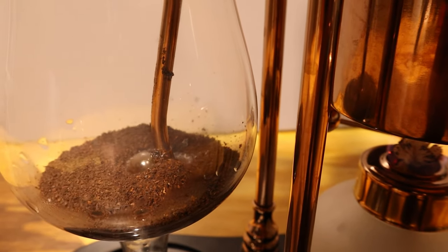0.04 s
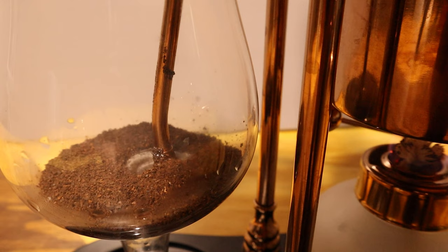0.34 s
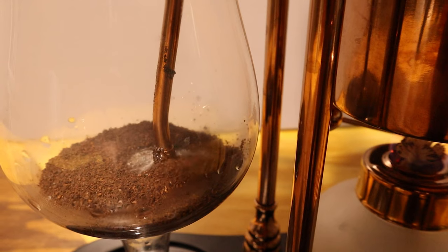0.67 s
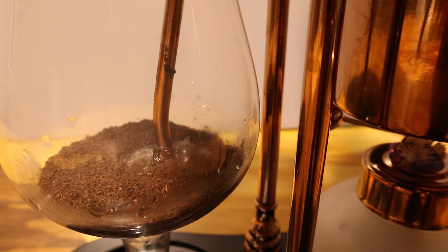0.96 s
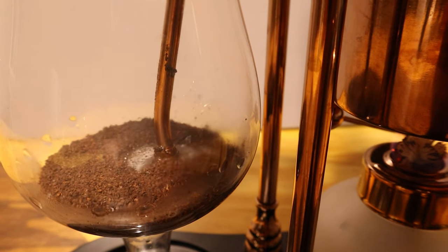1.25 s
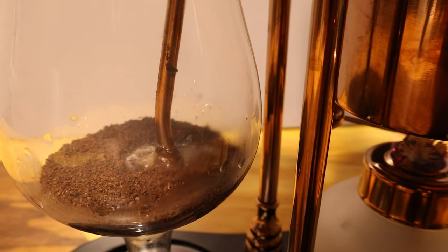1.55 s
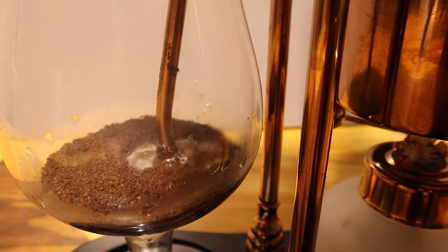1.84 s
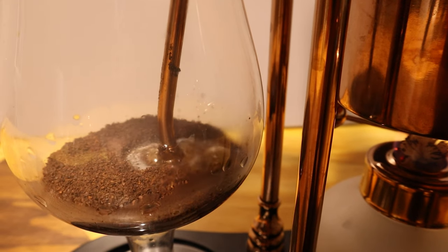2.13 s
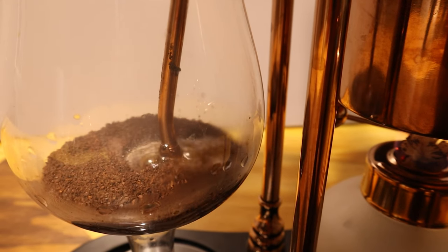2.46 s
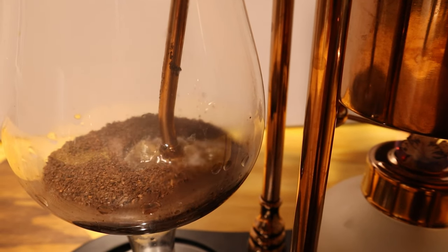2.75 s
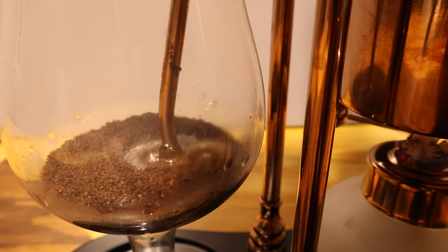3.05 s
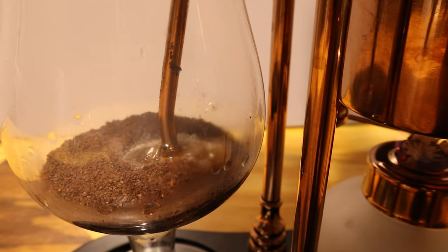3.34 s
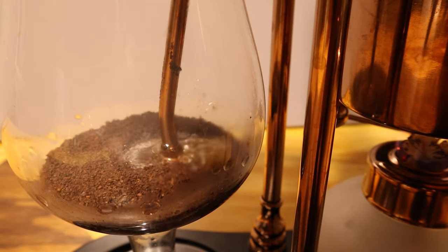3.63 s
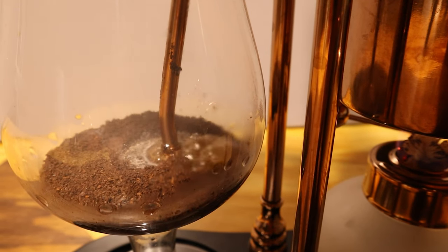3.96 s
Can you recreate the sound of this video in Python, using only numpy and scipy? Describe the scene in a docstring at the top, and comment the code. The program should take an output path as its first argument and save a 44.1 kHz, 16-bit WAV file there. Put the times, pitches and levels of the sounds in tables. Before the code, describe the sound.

Close, steady bubbling and gurgling comes from a glass coffee brewer in a small room. Hollow plops, dull knocks and a faint wet fizz mix with the rapid glugs, and sharper pops stand out in the second half.

```python
"""Glass siphon coffee brewer at the boil

Close by, indoors. Steam gulps through the water in quick low glugs over a simmer of small bubbles,
stalling now and then; a narrow cavity answers with hollow plops, and collapsing steam bubbles knock.
Wet fizz follows the glugs. Bubbles break through the grounds and pop in the glass, louder later on."""
import sys
import numpy as np
from scipy import signal
from scipy.fft import rfft, irfft, next_fast_len
from scipy.io import wavfile
from scipy.ndimage import map_coordinates

SR = 44100
rng = np.random.default_rng(int(sys.argv[2]) if len(sys.argv) > 2 else 0)


def wrap_up_sound(samples):
    """Save the sound to the file named by the first command line argument, as 16-bit audio."""
    columns = np.atleast_2d(samples).T
    # keep every value between -1 and 1, then stretch to whole-number steps
    tamed = np.clip(columns, -1, 1)
    steps = np.round(tamed * 32767).astype(np.int16)
    wavfile.write(sys.argv[1], SR, steps)


N = 176400
TIME_S = np.arange(N) / SR


def amp(db):
    return 10 ** (np.asarray(db) / 20)


def unit(x):
    return x / np.sqrt(np.mean(x ** 2) + 1e-20)


def noise():
    return rng.standard_normal(N)


def wobble(knots_per_s):
    """Smooth random curve."""
    knots = rng.standard_normal(int(N * knots_per_s / SR) + 4)
    return map_coordinates(knots, [TIME_S * knots_per_s])


def filtered(x, response):
    """x times a complex response of frequency."""
    size = next_fast_len(N + SR // 2)
    return irfft(rfft(x, size) * response(np.fft.rfftfreq(size, 1 / SR)), size)[:N]


def coloured(x, points):
    """x through a minimum-phase filter with the given (Hz, dB) points; rms 1."""
    hz, db = np.transpose(points)
    size = 4096
    log_hz = np.log(np.fft.rfftfreq(size, 1 / SR) + 1)
    cepstrum = irfft(np.log(amp(np.interp(log_hz, np.log(hz), db))))
    cepstrum[1:size // 2] *= 2
    cepstrum[size // 2 + 1:] = 0
    impulse = irfft(np.exp(rfft(cepstrum)))
    return unit(signal.fftconvolve(x, impulse)[:N])


def ring(x, modes, direct=0):
    """x through (Hz, width Hz, dB) resonances, plus a direct share."""
    return filtered(x, lambda f: direct + sum(
        amp(db) * 1j * f * width / (hz * hz - f * f + 1j * f * width) for hz, width, db in modes))


def swell(peak_s, rise_s, t60_s):
    """Envelope that rises to 1, then dies away."""
    t = TIME_S - peak_s
    return np.exp(-(np.minimum(t, 0) / rise_s) ** 2) * amp(-60 * np.maximum(t, 0) / t60_s)


def bubbles(peak_s, gain, hz, rise_s, t60_s, glide):
    """Bubbles ring and glide upward; returns sound and envelope."""
    offsets = np.arange(-SR // 40, SR // 12)
    t = offsets / SR
    peak_s, gain, hz, rise_s, t60_s = (np.reshape(v, (-1, 1)) for v in (peak_s, gain, hz, rise_s, t60_s))
    fade = (np.hypot(np.maximum(t, 0), rise_s / 2) - rise_s / 2) / t60_s
    env = gain * np.exp(-(np.minimum(t, 0) / rise_s) ** 2 - np.log(1000) * fade)
    cycles = hz * t * (1 + glide * t / t60_s) + rng.random(peak_s.shape)
    wave = env * np.sin(2 * np.pi * cycles)
    at = np.round(peak_s * SR).astype(int) + offsets
    inside = (at >= 0) & (at < N)
    return [np.bincount(at[inside], v[inside], N) for v in (wave, env)]


def swarm(drive, per_s, hz, spread, t60_cycles, rise_cycles, scatter_db, glide, drift_hz_per_s=0):
    """Random bubbles whose strength follows the drive; rms 1."""
    count = int(per_s * N / SR)
    jitter, detune, strength = rng.standard_normal((count, 3)).T
    peak_s = ((np.arange(count) + jitter) / per_s) % (N / SR)
    pitch_hz = (hz + drift_hz_per_s * peak_s) * np.exp(spread * detune)
    gain = amp(scatter_db * strength) * np.interp(peak_s, TIME_S, drive)
    return unit(bubbles(peak_s, gain, pitch_hz, rise_cycles / pitch_hz, t60_cycles / pitch_hz, glide)[0])


# Background spectrum: (frequency [Hz], gain [dB])
HISS_SPECTRUM = [(20, -3), (60, 14), (300, 20), (1000, 7), (3500, 0), (4300, -3), (5300, -1), (6000, 6),
                 (6400, -5.5), (6900, -15), (8200, -5.5), (9500, -13.5), (11000, -9), (12500, -18.5),
                 (14300, -17.5), (15800, -28)]


def hiss():
    """Faint steady background noise."""
    return amp(-60.5) * coloured(noise(), HISS_SPECTRUM)


def room(x, t60_s=0.32):
    """Short reverberant tail of a small room."""
    t = TIME_S[:SR // 3]
    tail = rng.standard_normal(len(t)) * amp(-60 * t / t60_s)
    return signal.fftconvolve(x, tail / np.linalg.norm(tail))[:N]


# High plips: (time [s], pitch [Hz], peak [dB])
PLIP_EVENTS = [(.275, 2760, -52.5), (.48, 2840, -53), (.578, 2725, -55), (.748, 2760, -53),
               (1.714, 2730, -56), (2.028, 2798, -54), (2.196, 5400, -63)]


def plips():
    """Soft, unsteady high plips, mostly at the cavity's overtone."""
    wavering_s = np.cumsum(1 + 0.05 * wobble(600)) / SR
    return sum(amp(db) * swell(at, rise_s=0.0031, t60_s=0.058) * np.sin(2 * np.pi * hz * wavering_s)
               for at, hz, db in PLIP_EVENTS)


# Bubble flurries: (start [s], length [s], level [dB])
SPLUTTER_EVENTS = [(0.27, 0.016, -48), (0.553, 0.047, -53), (.74, 0.015, -50), (1.055, 0.031, -42.5),
                   (1.165, 0.018, -49.5), (1.785, 0.018, -51.5), (1.826, 0.012, -47.5), (2.123, 0.051, -55),
                   (2.198, .03, -48.5), (3.14, .03, -50), (3.615, 0.013, -46), (3.767, 0.013, -47.5)]


def splutters(edge_s=0.0013):
    """Small bubbles ring in short dense flurries."""
    env = np.zeros(N)
    for start_s, length_s, db in SPLUTTER_EVENTS:
        outside_s = np.maximum(np.abs(TIME_S - start_s - length_s / 2) - length_s / 2, 0)
        env += amp(db) * np.exp(-outside_s / edge_s)
    return env * swarm(np.ones(N), per_s=900, hz=790, spread=0.37, t60_cycles=6.3, rise_cycles=0.37,
                       scatter_db=3, glide=0.14)


# Air modes of the glass bowl: (frequency [Hz], width [Hz], gain [dB])
BOWL_MODES = [(1915, 290, 4), (2256, 74, 1), (2754, 29, 0.5), (3002, 43, 10.5), (3160, 120, 5.5),
              (3442, 46, 11), (3684, 116, 5.5), (4693, 41, 6.5), (5530, 60, -1.5), (5870, 270, -1),
              (7380, 28, 0), (8175, 170, 0.5), (8340, 57, -4), (8710, 61, -1), (9500, 77, 2.5),
              (9850, 100, -2), (10470, 74, -1), (12900, 130, -1)]
# Fizz spectrum: (frequency [Hz], gain [dB])
FIZZ_SPECTRUM = [(300, 2), (1000, 13), (1700, -4), (2250, 9), (2520, 4.5), (3000, -2), (3700, -3.5),
                 (4250, -6.5), (5900, -5), (6900, -14.5), (8200, -14.5), (12000, -27), (15500, -49)]


def fizz(flow, push):
    """Wet spray follows each gulp and rings the bowl."""
    spray = noise() * flow * (1.08 + push) * amp(6.2 * np.tanh(wobble(170)))
    return coloured(ring(spray, BOWL_MODES, direct=0.36), FIZZ_SPECTRUM)


# Surface bursts: (time [s], relative level [dB])
POP_EVENTS = [(0.127, -54), (.432, -56), (.448, -52), (.541, -52), (.56, -53.5), (.69, -54.5),
              (.715, -51.5), (.993, -51.5), (1.082, -53.5), (1.408, -54), (1.534, -55), (2.126, -48),
              (2.218, -52.5), (2.428, -48), (2.466, -47), (2.484, -49), (2.5809, -39), (2.589, -35),
              (2.746, -47.5), (2.853, -43), (2.859, -53), (3.048, -49.5), (3.201, -48.5), (3.285, -49),
              (3.352, -41), (3.3554, -34.5), (3.646, -44.5), (3.65, -46), (3.713, -47.5), (3.779, -47.5),
              (3.786, -50), (3.79, -34), (3.794, -46), (3.8012, -40.5), (3.917, -40), (3.921, -41.5),
              (3.951, -49.5)]
# Spray and film-snap spectra: (frequency [Hz], gain [dB])
SPRAY_SPECTRUM = [(300, -28), (1200, 2.5), (1900, -1.5), (3600, -3), (4300, 0.5), (6000, -4.5), (6900, -17),
                  (7800, -0.5), (8500, -2), (9300, -6.5), (10700, -6), (12200, -16), (15500, -20)]
SNAP_SPECTRUM = [(300, -36), (1200, -1.5), (1900, 3), (3700, 2.5), (4500, -14), (6000, -16.5), (15500, -35)]


def pops(snap_rise_s=0.00069, spray_rise_s=0.0019, crossover_hz=4430):
    """Each film snaps, then a brief spray rings the bowl; strong bursts are brighter."""
    def lowpass(hz):
        return 1 / np.sqrt(1 + (hz / crossover_hz) ** 8)

    start_s, db = np.transpose(POP_EVENTS)
    treble_db = db + 0.35 * (db - db.max())
    shapes = np.array([swell(at + spray_rise_s, spray_rise_s, t60_s=0.05) for at in start_s])
    spatter = amp(6 * np.tanh(wobble(450)))
    body = noise() * np.sqrt(amp(db) ** 2 @ shapes ** 2)
    treble = noise() * np.sqrt(amp(treble_db) ** 2 @ shapes ** 2)
    spray = filtered(body, lowpass) + filtered(treble, lambda hz: np.sqrt(1 - lowpass(hz) ** 2))
    splash = np.std(body) * coloured(ring(spatter * spray, BOWL_MODES, direct=0.32), SPRAY_SPECTRUM)
    clicks = noise() * sum(amp(level) * swell(at + snap_rise_s, snap_rise_s, t60_s=0.011)
                           for at, level in POP_EVENTS)
    snap = np.std(clicks) * coloured(clicks, SNAP_SPECTRUM)
    return amp(-3.5) * splash + amp(-0.5) * snap


CAVITY_HZ, CAVITY_DRIFT_HZ_PER_S, CAVITY_WIDTH_HZ = 1303.2, 11.6, 55


def cavity(flow):
    """Surging steam rings a narrow cavity whose pitch creeps upward."""
    surge = amp(5 * np.tanh(wobble(70))) * noise() * flow
    first, last = (ring(surge, [(CAVITY_HZ + CAVITY_DRIFT_HZ_PER_S * at, CAVITY_WIDTH_HZ, 0)])
                   for at in (0, N / SR))
    blend = np.arange(N) / N
    return unit(ring((1 - blend) * first + blend * last, [(1245, 400, 0)]))


# Cavity plops: (peak time [s], relative level [dB])
PLOP_EVENTS = [(.008, -38.5), (0.095, -36), (0.273, -39), (0.424, -41), (0.474, -40.5), (0.584, -32),
               (0.663, -40.5), (0.753, -38.5), (0.839, -40), (0.892, -38.5), (1.004, -36), (1.085, -34),
               (1.172, -36.5), (1.267, -44), (1.315, -40.5), (1.351, -37), (1.429, -35.5), (1.511, -40),
               (1.639, -27.5), (1.732, -38.5), (2.028, -34), (2.199, -42), (2.246, -41.5), (2.498, -38.5),
               (2.615, -42), (3.158, -40), (3.175, -37), (3.233, -38), (3.587, -38), (3.801, -40.5),
               (3.834, -41)]
# Water wash spectrum: (frequency [Hz], gain [dB])
WASH_SPECTRUM = [(200, -3.5), (450, 10.5), (800, -2.5), (1100, 10), (1500, 9.5), (1900, -24.5), (2400, -26),
                 (2800, -11.5), (3300, -26), (6000, -40)]


def plops(overtone_hz=2733):
    """The cavity answers with a short hollow note, a weak overtone and a wash of water."""
    peak_s, db = np.transpose(PLOP_EVENTS)
    detune = 1 + 0.0073 * rng.standard_normal(len(peak_s))
    note_hz = CAVITY_HZ + CAVITY_DRIFT_HZ_PER_S * peak_s
    shape = dict(rise_s=0.009, t60_s=0.032, glide=0.03)
    note, env = bubbles(peak_s, amp(db), note_hz * detune, **shape)
    overtone, _ = bubbles(peak_s, amp(db), overtone_hz * detune, **shape)
    wash = env * coloured(noise(), WASH_SPECTRUM)
    return amp(-1.5) * note + amp(-26) * overtone + amp(-10.5) * wash


# Steam bubble collapses: (time [s], peak [dB])
KNOCK_EVENTS = [(.057, -42), (.081, -38), (0.178, -31), (0.352, -34), (.579, -45), (0.66, -32),
                (0.836, -38), (1.057, -31), (1.075, -31), (1.169, -31), (1.239, -43), (1.698, -34.5),
                (1.798, -33), (2.022, -43), (2.121, -38), (2.45, -33), (2.727, -52), (2.788, -36),
                (3.075, -34), (3.619, -44), (3.745, -39)]
# Water and cavity modes: (frequency [Hz], width [Hz], gain [dB])
KNOCK_RESONANCES = [(310, 180, 3), (524, 97, 2), (900, 440, -14), (1327, 45, 6.5)]


def knocks(lowpass_hz=1490):
    """Collapsing steam bubbles give dull knocks that ring the water and the cavity."""
    blows = np.zeros(N)
    for at, db in KNOCK_EVENTS:
        blows[round(at * SR)] = amp(db)
    dull = filtered(ring(blows, KNOCK_RESONANCES), lambda hz: 1 / (1 + 1j * hz / lowpass_hz) ** 2)
    return dull * blows.max() / np.abs(dull).max()


# Boil rumble spectrum: (frequency [Hz], gain [dB])
RUMBLE_SPECTRUM = [(20, -50), (40, -35), (62, -11), (100, -8.5), (170, -5.5), (250, 5), (400, -1),
                   (800, -21.5), (1600, -52.5)]


def rumble(flow):
    """Low noise driven by the steam flow."""
    return amp(-45.5) * coloured(noise() * flow, RUMBLE_SPECTRUM)


def simmer(flow, push):
    """Steam drives two swarms of ringing bubbles, a little harder at each gulp."""
    drive = unit(flow * (8.1 + push))
    large = swarm(drive, per_s=150, hz=292, spread=0.24, t60_cycles=8.2, rise_cycles=0.54,
                  scatter_db=1.5, glide=0.11, drift_hz_per_s=4.3)
    small = swarm(drive, per_s=500, hz=541.7, spread=0.27, t60_cycles=7.3, rise_cycles=0.46,
                  scatter_db=3, glide=0.11, drift_hz_per_s=-33.5)
    return large + amp(-4) * small


# Steam gulps: (start [s], length [s], relative level [dB], nominal pitch [Hz])
GULP_EVENTS = [(0.05, 0.021, -31, 300.8), (0.117, 0.024, -30.5, 316.8), (0.206, 0.0066, -34.5, 348),
               (0.237, 0.05, -34.5, 317), (0.315, 0.019, -31.5, 302.0), (0.371, 0.017, -30.5, 320.1),
               (0.415, 0.037, -29.5, 310), (0.484, 0.024, -37.5, 323), (0.529, 0.033, -30.5, 324),
               (0.583, 0.026, -40, 304.7), (0.625, 0.0072, -31, 313.5), (0.654, 0.012, -32.5, 348.5),
               (0.677, 0.017, -32, 328.5), (0.705, 0.014, -30, 314.6), (0.776, 0.0097, -30, 301.9),
               (0.784, 0.056, -35.5, 333.3), (0.86, 0.042, -42, 310.3), (0.868, 0.031, -37, 348),
               (0.913, 0.039, -34.5, 323), (0.972, 0.03, -31.5, 305.4), (1.002, 0.018, -32, 307.2),
               (1.041, 0.034, -32, 323), (1.08, 0.035, -44, 335), (1.157, 0.032, -38, 339.6),
               (1.198, 0.02, -33, 305), (1.268, 0.026, -36, 302.5), (1.303, 0.021, -35, 348.4),
               (1.35, 0.013, -29.5, 317.8), (1.397, 0.015, -27.5, 311.6), (1.428, 0.035, -37, 351),
               (1.487, 0.015, -28, 290.5), (1.533, 0.015, -30, 298.5), (1.566, 0.046, -48, 313.6),
               (1.616, 0.035, -34.5, 328), (1.678, 0.02, -29.5, 291.8), (1.711, 0.05, -33.5, 319.1),
               (1.76, 0.032, -28.5, 321.8), (1.859, 0.034, -30.5, 310.0), (1.905, 0.022, -29.5, 303.6),
               (1.935, 0.021, -31, 305.4), (1.967, 0.038, -30.5, 304.4), (2.05, 0.025, -33, 309.7),
               (2.114, 0.012, -24, 293.0), (2.157, 0.013, -29.5, 329.0), (2.187, 0.014, -31.5, 311.8),
               (2.215, 0.014, -34, 335.6), (2.251, 0.018, -28, 299), (2.295, 0.017, -32, 298.8),
               (2.37, 0.014, -28, 306), (2.394, 0.04, -34, 318.4), (2.452, 0.028, -29, 310.8),
               (2.524, 0.02, -35, 310.8), (2.575, 0.054, -30, 316.5), (2.649, 0.016, -34, 315.4),
               (2.688, 0.021, -30.5, 310.2), (2.712, 0.016, -32.5, 356.5), (2.729, 0.026, -35.5, 302.8),
               (2.782, 0.016, -33, 349.3), (2.801, 0.015, -33.5, 339.8), (2.827, 0.07, -32.5, 324.1),
               (2.927, 0.015, -32, 326.2), (2.945, 0.04, -30.5, 302.7), (3.009, 0.056, -36, 301.7),
               (3.118, 0.023, -30, 354), (3.163, 0.017, -33.5, 314.3), (3.192, 0.014, -28.5, 319.4),
               (3.268, 0.016, -31.5, 306.7), (3.288, 0.021, -32.5, 330.3), (3.313, 0.015, -35, 321.8),
               (3.322, 0.026, -37.5, 309.8), (3.382, 0.036, -29.5, 318), (3.424, 0.016, -31, 318.4),
               (3.469, 0.013, -33.5, 315.0), (3.536, 0.031, -31, 323.2), (3.619, 0.026, -29.5, 318.7),
               (3.652, 0.024, -30.5, 337), (3.707, 0.015, -28, 314.6), (3.741, 0.021, -31.5, 333),
               (3.771, 0.033, -29, 304.4), (3.811, 0.017, -34, 354.5), (3.824, 0.043, -32.5, 319),
               (3.897, 0.021, -32, 338.6), (3.94, 0.011, -34, 299.7), (3.958, 0.032, -33, 331.7)]


def glugs(attack_s=0.0016, release_s=0.0017, floor_db=-41, shake_db=1.5):
    """A steam pocket throbs at an unsteady pitch, harder at each gulp; returns sound and envelope."""
    start_s, length_s, db, hz = np.transpose(GULP_EVENTS)
    grid_s = TIME_S[::SR // 2000]
    before_s = np.maximum(start_s[:, None] - grid_s, 0)
    after_s = np.maximum(grid_s - (start_s + length_s)[:, None], 0)
    gulps = amp(db)[:, None] * np.exp(-before_s / attack_s - after_s / release_s)
    push = np.interp(TIME_S, grid_s, gulps.max(axis=0))
    pinch = np.log(1 + np.exp(2 * wobble(260))) / 2  # brief pinches raise the pitch
    bend = 0.89 + 0.2 * pinch + 0.05 * wobble(70)
    pitch_hz = np.interp(TIME_S, start_s + length_s / 2, hz) * bend
    gain = np.maximum(amp(-1.33) * push, amp(floor_db)) * amp(shake_db * wobble(200))
    return gain * np.sin(2 * np.pi * np.cumsum(pitch_hz) / SR), unit(push)


# Steam stalls: (centre [s], length [s], depth [dB])
STALLS = [(0.042, 0.031, 20), (0.1, 0.024, 9.5), (0.165, 0.039, 4.5), (0.356, 0.024, 10),
          (0.648, 0.017, 16), (1.22, 0.02, 9), (1.655, 0.011, 22), (1.052, 0.011, 3), (2.015, 0.011, 8),
          (2.047, 0.01, 11), (2.114, 0.02, 16), (2.289, 0.021, 10), (2.369, 0.017, 18.5),
          (2.446, 0.019, 11), (2.687, 0.031, 6), (2.765, 0.017, 38), (3.067, 0.0087, 6.5), (3.46, 0.017, 6),
          (3.525, 0.019, 7.5)]
# Boil strength: (time [s], simmer [dB], cavity [dB], fizz [dB])
BOIL_LEVELS = [(0, -44, -57.5, -63.5), (.6, -45.5, -50.5, -63.5), (1.401, -45.5, -50.5, -61),
               (2.5, -43.5, -54, -61), (4, -41.5, -55.5, -60.5)]


def boil():
    """Steam drives the glugs, simmer, cavity, rumble and fizz; all dip when it stalls."""
    knots_s, *levels_db = np.transpose(BOIL_LEVELS)
    simmer_gain, cavity_gain, fizz_gain = (amp(np.interp(TIME_S, knots_s, db)) for db in levels_db)
    flow = amp(-sum(db * np.exp(-(2 * (TIME_S - at) / length_s) ** 4) for at, length_s, db in STALLS))
    throb, push = glugs()
    bubbling = simmer_gain * simmer(flow, push)
    hollow = cavity_gain * cavity(flow)
    return flow * (throb + bubbling + rumble(flow)) + hollow + fizz_gain * fizz(flow, push)


def scene():
    """The brewer in its room, over a faint hiss."""
    brewer = boil() + plops() + splutters() + plips() + knocks() + pops()
    return (brewer + amp(-21.5) * room(brewer) + hiss())[None]


def record(dry):
    """The microphone sheds deep bass and passes nothing above the band limit."""
    low_cut_hz, top_hz = 25, 15750
    return filtered(dry[0], lambda hz: (1j * hz / (low_cut_hz + 1j * hz)) ** 2 * (hz < top_hz))[None]


dry = scene()
out = record(dry)
wrap_up_sound(out)
```